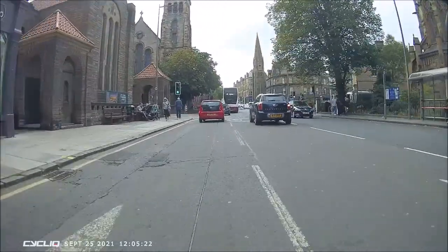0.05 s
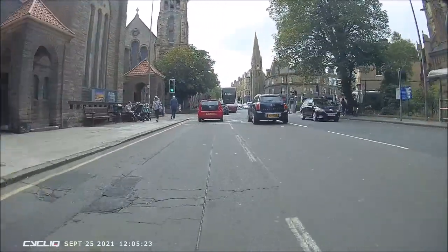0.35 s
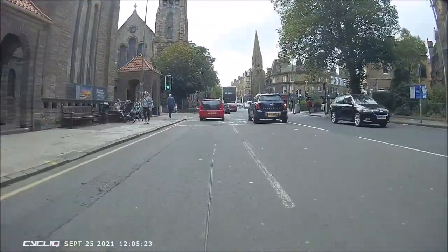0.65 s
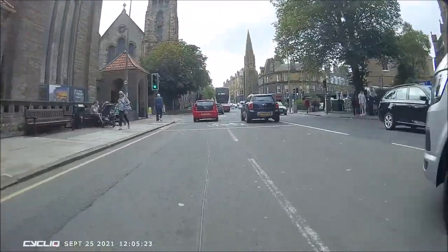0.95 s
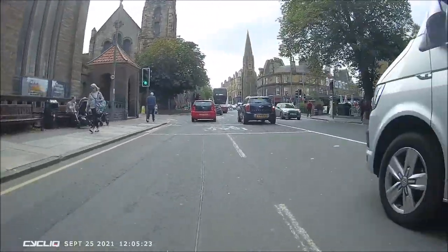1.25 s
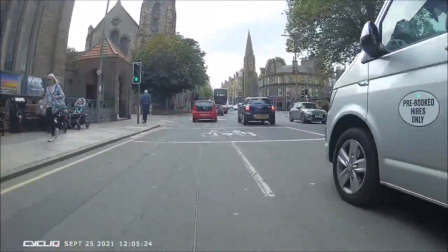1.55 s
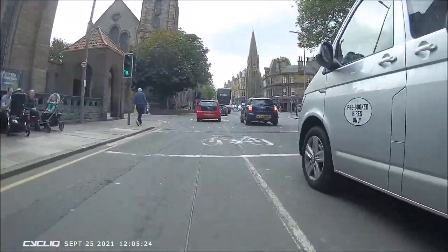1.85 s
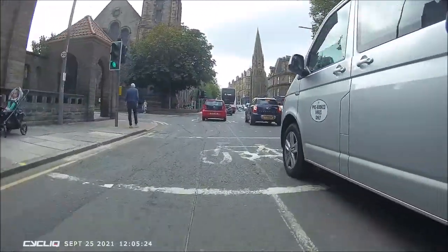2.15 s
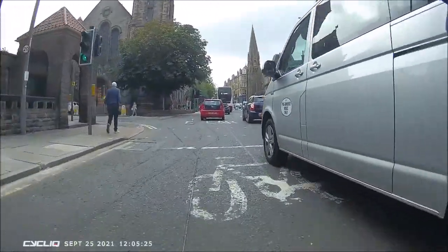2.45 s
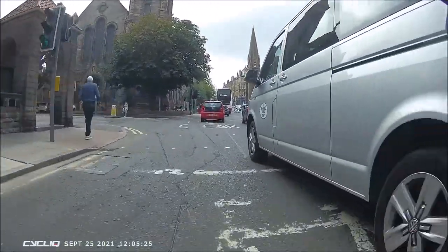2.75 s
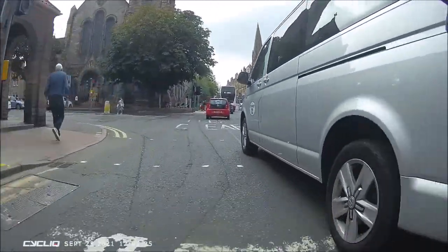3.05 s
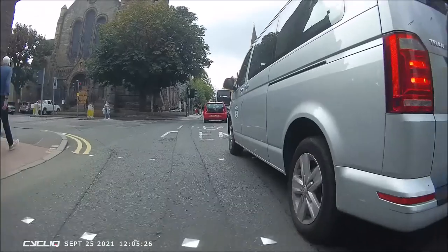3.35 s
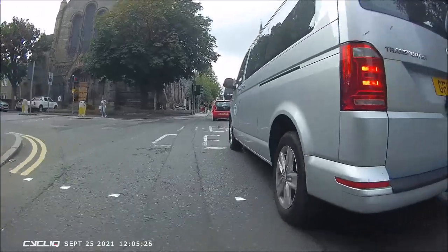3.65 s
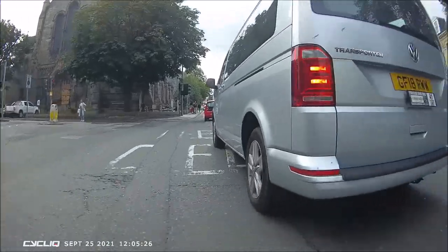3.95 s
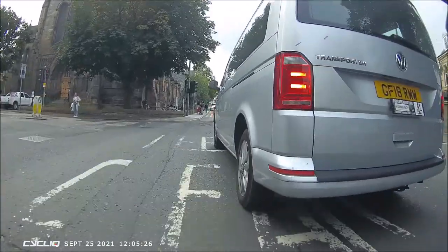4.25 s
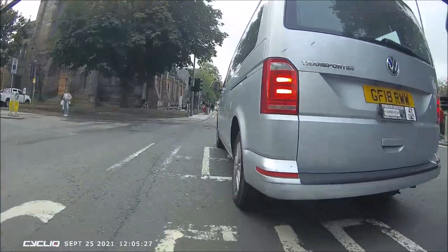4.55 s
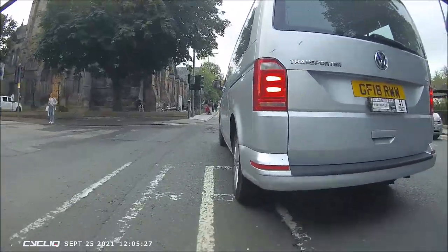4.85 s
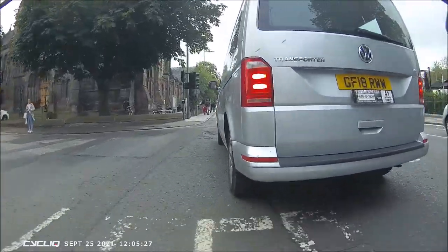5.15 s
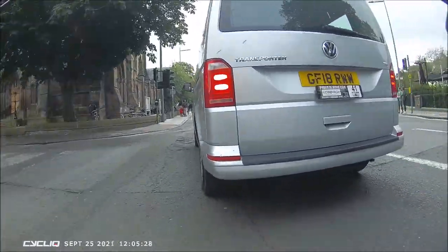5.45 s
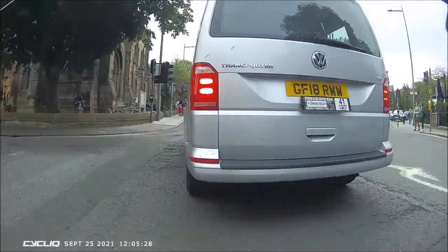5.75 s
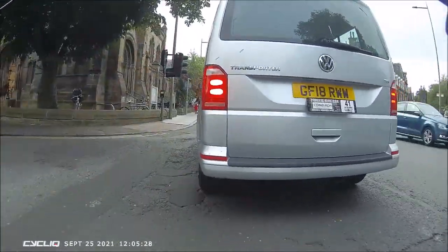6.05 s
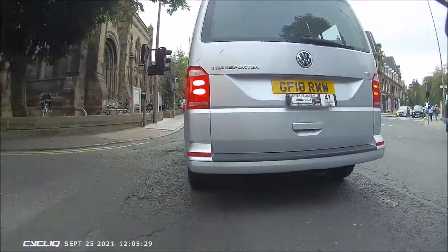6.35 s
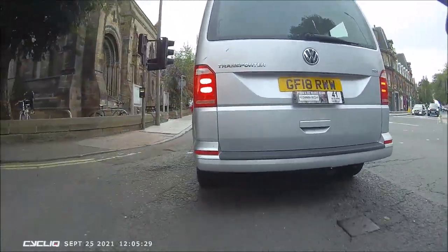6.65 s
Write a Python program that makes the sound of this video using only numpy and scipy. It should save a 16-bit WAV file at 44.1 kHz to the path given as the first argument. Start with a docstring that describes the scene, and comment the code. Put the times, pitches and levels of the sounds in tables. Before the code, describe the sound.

A bicycle rolls through city traffic with rumbling tyres, wind and rattling bumps, and its bell rings three times.

```python
"""A low drone and a roar of tyres and traffic: a bicycle on a city street, heard from a handlebar camera.
The road shakes the camera case, wind buffets the microphone, grit snaps and bumps rattle the bike.
A van alongside booms on and off. From about 3.9 s the rider flicks the bell three times: the lever
clacks through the bar and the dome rings on. The street quietens as the bike slows."""
import sys
import numpy as np
from scipy import signal
from scipy.fft import rfft, irfft
from scipy.io import wavfile
from scipy.ndimage import uniform_filter1d

SR = 44100
rng = np.random.default_rng(int(sys.argv[2]) if len(sys.argv) > 2 else 0)


def to_wav(s):
    """Save 16-bit WAV."""
    ch = np.atleast_2d(s).T  # columns
    pcm = np.round(np.clip(ch, -1, 1) * 32767)  # PCM
    wavfile.write(sys.argv[1], SR, pcm.astype(np.int16))


N = 299880
TIME = np.arange(N) / SR
BINS = np.fft.rfftfreq(N, 1 / SR)

# tyre and traffic noise, falling as the bike slows: t/s, level/dB
RIDE_LEVEL = [(0.0, -48), (0.26, -48), (1.89, -45), (2.27, -47.5), (2.69, -49), (2.86, -50.5),
              (3.84, -51.5), (4.53, -53.5), (4.85, -54), (5.36, -56.5), (5.64, -54), (6.02, -58),
              (6.29, -62.5), (6.8, -62)]
# loose fittings: f/Hz, level/dB, t60/s
FITTING_MODES = [(1220, -13, 0.023), (1553, -8.5, 0.034), (2180, 2.5, 0.0052), (2564, -4, 0.017),
                 (2970, -11, 0.0085), (3793, -17.5, 0.02), (4450, -21.5, 0.0098), (5700, -28, 0.0068),
                 (6900, -26, 0.0061), (9000, -26, 0.0086)]
# rattling parts, likely chain and mudguard: f/Hz, level/dB, t60/s
RATTLE_MODES = [(1154, 0.5, 0.031), (1555, 3.5, 0.024), (1840, -4, 0.033), (2100, -0.5, .014),
                (2400, -3.5, 0.016), (2750, -12, 0.017), (3200, -21.5, .025), (3760, -20, 0.014),
                (4090, -17, 0.014), (4800, -20.5, .02), (6600, -20.5, 0.006)]
# the bike's frame: f/Hz, level/dB, t60/s
FRAME_MODES = [(348, 0.5, 0.063), (455, 2, 0.047), (731, 4.5, 0.025), (915, 1, 0.017)]


def amp(db):
    """Decibels to gain."""
    return 10 ** (np.asarray(db) / 20)


def unit(x):
    """Scales to rms 1."""
    return x / np.sqrt(np.mean(x ** 2) + 1e-20)


def fader(points):
    """A gain for every sample from points of t/s, level/dB."""
    times, db = np.transpose(points)
    return amp(np.interp(TIME, times, db))


def follow_ride(db, slope, cruise_db=-48):
    """A gain of db when cruising that moves by slope dB per dB of tyre noise."""
    return amp(db) * (fader(RIDE_LEVEL) / amp(cruise_db)) ** slope


def swell(base, events):
    """Adds the power of smooth swells (t/s, level/dB, half length/s) to a base gain."""
    power = sum(amp(db) ** 2 * np.exp(-((TIME - s) / half) ** 2) for s, db, half in events)
    return np.sqrt(base ** 2 + power)


def add(mix, s, sound):
    """Lays a sound into the mix at time s."""
    part = mix[round(s * SR):][:len(sound)]
    part += sound[:len(part)]


def colour(x, points):
    """Shapes x with an EQ curve (f/Hz, level/dB), at rms 1."""
    hz, db = np.transpose(points)
    bins = np.fft.rfftfreq(len(x), 1 / SR)
    curve = amp(np.interp(np.log(bins + 1), np.log(hz), db))
    return unit(irfft(rfft(x) * curve, len(x)))


def resonate(x, peaks):
    """Passes x through steep-sided resonances (f/Hz, width/Hz, level/dB), at rms 1."""
    power = sum(amp(db) ** 2 / (1 + ((BINS - hz) / width) ** 2 * 2) ** 3 for hz, width, db in peaks)
    return unit(irfft(rfft(x) * np.sqrt(power), N))


def drift(rate_hz):
    """Slow random movement of rms 1."""
    return unit(irfft(rfft(rng.standard_normal(N)) * np.exp(-(BINS / rate_hz) ** 2), N))


def decay(t, t60):
    """An envelope that falls 60 dB in t60 seconds."""
    return np.exp(-np.log(1000) * t / t60)


def ring(modes, soft_hz=5500, size=4096):
    """Damped modes after one blow; the contact takes a moment, which dulls the attack."""
    t = np.arange(size) / SR
    swing = sum((-1) ** k * amp(db) * decay(t, t60) * np.sin(2 * np.pi * hz * t)
                for k, (hz, db, t60) in enumerate(modes))
    return signal.lfilter(*signal.butter(2, soft_hz, fs=SR), swing)


def road(case_db=1, tyres_db=-0.5, lumps_db=2.2, flutter_db=1.5, treble_hz=2100):
    """The bed: tarmac shakes the case; tyres and traffic roar through the mic port over faint hiss."""
    # broad resonances of the camera case and of the microphone port: f/Hz, width/Hz, level/dB
    case_peaks = [(98, 44, -4.5), (156, 49, -7.5), (355.5, 46, -10.5), (400, 63, -12.5), (477.3, 58, -17),
                  (634, 17, -30.5)]
    port_peaks = [(726, 352, 3.5), (917, 210, -0.5), (1240, 290, -5.5), (1610, 520, -10.5),
                  (2180, 190, -14.5), (2430, 170, -11), (2875, 170, -12), (3240, 90, -23.5),
                  (3814, 250, -26), (4240, 550, -37), (4820, 150, -35.5)]
    # tone of the air hiss: f/Hz, level/dB
    hiss_eq = [(500, 15.5), (4000, 2.5), (7000, -2.5), (10500, -6), (12000, -20), (13500, -33),
               (16000, -35.5)]
    # its fader: t/s, level/dB
    hiss_level = [(0, -70.5), (1.3, -70.7), (1.9, -74), (2.5, -76), (3.4, -82), (3.9, -74.5), (5.3, -80),
                  (5.7, -82.5), (6.3, -82.5), (6.8, -85)]
    shake, roar, hiss = rng.standard_normal((3, N))
    case = amp(case_db) * resonate(shake, case_peaks) * amp(lumps_db * drift(8.7))
    tyres = amp(tyres_db) * resonate(roar, port_peaks) * amp(flutter_db * drift(22))
    dull = signal.sosfiltfilt(signal.butter(2, treble_hz, fs=SR, output="sos"), tyres)
    tyres = dull + (tyres - dull) * follow_ride(db=0.54, slope=1)  # the top fades as the bike slows
    air = colour(hiss, hiss_eq) * fader(hiss_level)
    return case * follow_ride(db=-36, slope=0.7) + tyres * fader(RIDE_LEVEL) + air


def case_drone(evenness=0.46, settle_s=0.057):
    """The road keeps the camera case humming; uneven tarmac makes it throb."""
    # the case's two chief resonances and a weaker neighbour: f/Hz, width/Hz, level/dB
    drone_peaks = [(212.9, 21.7, 2), (250.4, 24, -0.06), (275.5, 11, -7)]
    # uneven stretches of tarmac: t/s, level/dB, half length/s
    bumps = [(0.028, -29.5, 0.04), (0.608, -30.5, 0.097), (0.928, -36, 0.025), (1.483, -27.5, 0.03),
             (1.74, -26.5, 0.031), (2.166, -23, 0.024), (2.546, -33, 0.082), (2.827, -27.5, 0.096),
             (3.091, -35.5, 0.14), (3.288, -33, 0.11), (3.532, -27.5, 0.021), (4.278, -29, 0.017),
             (4.73, -30, 0.017), (5.156, -33.5, 0.034), (6.552, -39.5, 0.096)]
    hum = resonate(rng.standard_normal(N), drone_peaks)
    envelope = np.sqrt(abs(uniform_filter1d(hum ** 2, round(settle_s * SR))) + 1e-6)
    steadied = unit(hum / envelope ** evenness)
    return steadied * swell(follow_ride(db=-34, slope=0.67), bumps)


def wind(buffet_db=-1.5, lumps_db=1.0):
    """Air buffets the microphone with a low rumble; its eddies reach higher."""
    # tone of the buffeting and of the eddies: f/Hz, level/dB
    buffet_eq = [(5, -12), (18, -4.5), (36, 5.5), (48, -1.5), (65, -21.5), (100, -15.5), (170, -21),
                 (400, -45.5), (1500, -84.5)]
    eddy_eq = [(20, -11.5), (45, -2), (75, 2), (130, -11), (200, -25.5), (500, -29.5), (1700, -42.5),
               (2600, -60), (3200, -71), (8000, -89), (15000, -115)]
    # gusts, the later ones in the van's wake: t/s, buffeting/dB, eddies/dB, half length/s
    gusts = [(0.166, -23, -50, 0.037), (0.758, -13, -26.5, 0.016), (2.668, -33.5, -31, 0.11),
             (3.153, -36.5, -33.5, 0.15), (3.385, -20.5, -44, 0.022), (4.953, -23.5, -29.5, 0.037),
             (5.53, -36.5, -33, 0.14), (5.677, -22.5, -36, 0.1), (5.943, -18.5, -27, 0.031),
             (6.134, -33.5, -33.5, 0.13), (6.582, -23.5, -34.5, 0.11)]
    buffet_gain = swell(follow_ride(db=-26.5, slope=0.68), [(s, db, half) for s, db, _, half in gusts])
    eddy_gain = swell(follow_ride(db=-47, slope=0.72), [(s, db, half) for s, _, db, half in gusts])
    buffet = amp(buffet_db) * colour(rng.standard_normal(N), buffet_eq) * amp(lumps_db * drift(36))
    eddies = colour(rng.standard_normal(N), eddy_eq)
    return buffet * buffet_gain + eddies * eddy_gain


def grit(per_s=70, spread_db=3, grit_db=-17):
    """Small stones keep the fittings ticking faintly."""
    stones = amp(spread_db * np.minimum(rng.exponential(1, N), 2.5))
    stones *= rng.random(N) < per_s / SR
    ticking = signal.oaconvolve(stones, ring(FITTING_MODES, soft_hz=4970))[:N]
    return amp(grit_db) * unit(ticking) * fader(RIDE_LEVEL)


def rattle(per_s=240, spread_db=5.0, clump_db=4, clump_hz=38):
    """Coarse tarmac sets off clumps of tiny metallic contacts."""
    # rattle over the coarse patches: t/s, level/dB
    rattle_level = [(0, -59), (2.2, -68.5), (2.6, -58), (2.95, -68), (3.8, -59.5), (4.5, -73.5),
                    (4.95, -61), (5.3, -75.5), (5.68, -57), (5.8, -62), (5.94, -54), (6.03, -62.5),
                    (6.19, -55.5), (6.31, -73.5), (6.44, -74), (6.5, -58), (6.72, -53), (6.8, -66)]
    contacts = rng.choice([-1, 1], N) * amp(spread_db * np.minimum(rng.exponential(1, N), 3))
    contacts *= rng.random(N) < per_s / SR
    clumps = amp(clump_db * np.minimum(drift(clump_hz), 2))
    jangle = signal.oaconvolve(contacts * clumps, ring(RATTLE_MODES, soft_hz=6960))[:N]
    return unit(jangle) * fader(rattle_level)


def tarmac_cracks(per_s=2.5, rattle_db=4, thud_db=7, spread_db=2):
    """Small cracks in the tarmac jog the frame and fittings at random, harder at speed."""
    hits = rng.random(N) < per_s / SR
    blows = hits * amp(spread_db * rng.standard_normal(N)) * fader(RIDE_LEVEL)
    fittings = amp(rattle_db) * ring(FITTING_MODES, soft_hz=5270)
    frame = amp(thud_db) * ring(FRAME_MODES, soft_hz=1500)
    return .5 * signal.oaconvolve(blows, fittings + frame)[:N]


def snaps(stir_db=-2, size=256):
    """Dry clicks, as of grit pinched under the tyre, that just stir the loose parts."""
    # the pinches: t/s, peak/dB
    cues = [(.158, -41), (0.2143, -44.5), (.543, -42), (0.6143, -43), (1.423, -43), (1.5776, -44.5),
            (1.8606, -47), (1.9514, -43), (2.153, -42), (2.568, -44), (2.6695, -45), (2.7481, -46),
            (2.857, -44), (2.8722, -40.5), (3.207, -42), (3.7403, -46.5), (4.935, -49), (5.6068, -49),
            (5.674, -38), (5.687, -40), (5.7015, -45), (6.492, -46), (6.540, -44.5), (6.5537, -47),
            (6.6035, -46), (6.656, -46.5)]
    # tone of the click: f/Hz, level/dB
    click_eq = [(1000, -5.5), (4000, 3.5), (7000, -4.5), (10500, -8), (12000, -11), (15500, -25)]
    click = colour(signal.unit_impulse(size, "mid"), click_eq)
    parts = ring(RATTLE_MODES)
    pinches = np.zeros(N)
    for s, db in cues:
        add(pinches, s, [amp(db)])
    clicks = signal.oaconvolve(pinches, click / click.max(), "same")
    stirred = signal.oaconvolve(pinches, parts / abs(parts).max())[:N]
    return clicks + amp(stir_db) * stirred


def jolts(chatter=0.26, blow=0.26, size=2048):
    """Each bump thuds in the frame while loose fittings chatter."""
    # bumps in the road: t/s, rattle/dB, thud/dB, chatter length/s
    cues = [(0.5579, -23, -28.5, 0.0025), (0.695, -26.5, -59, 0.0027), (0.83, -33, -37, 0.0027),
            (1.381, -27, -29, 0.0026), (1.805, -31, -29.5, 0.0013), (1.8511, -13.5, -16.5, 0.0029),
            (1.9640, -50, -19, 0.01), (2.017, -24.5, -29, 0.0026), (2.0650, -23.5, -19.5, 0.0082),
            (2.155, -19, -12.5, 0.0089), (2.1803, -26.5, -32, 0.0013), (2.391, -48, -33.5, 0.0027),
            (2.4762, -17.5, -41, 0.0014), (2.7053, -30.5, -28, 0.0032), (3.262, -32.5, -32.5, 0.0022),
            (3.301, -29, -70, 0.001), (3.493, -47.5, -37.5, 0.0022), (3.823, -38, -33, 0.0012),
            (4.122, -26, -16.5, 0.0032), (4.3490, -23.5, -20, 0.00091), (4.59, -21, -24.5, 0.0023),
            (4.674, -43, -48, 0.0015), (4.6944, -17, -23, 0.0041), (4.894, -27, -54.5, 0.0045),
            (4.981, -33, -57, 0.0062), (5.458, -33, -32, 0.0036), (5.6610, -25.5, -34, 0.0015),
            (5.683, -30, -37, 0.0034), (5.715, -35, -46, 0.002), (5.7757, -41, -45, 0.003),
            (5.88, -43, -44, 0.0022), (6.045, -40.5, -48, 0.003), (6.0902, -38, -46, 0.003),
            (6.133, -37, -37, 0.0034), (6.145, -38, -35, 0.003), (6.194, -42.5, -50.5, 0.0023),
            (6.499, -43, -29, 0.0083), (6.563, -40, -35.5, 0.0083), (6.676, -37.5, -33, 0.0083),
            (6.7266, -34.5, -38, 0.0065)]
    out, t = np.zeros(N), np.arange(size) / SR
    fittings, frame = ring(FITTING_MODES, soft_hz=5200), ring(FRAME_MODES, soft_hz=1490)
    for s, rattle_db, thud_db, length in cues:
        contacts = rng.standard_normal(size) * t * np.exp(-2 * t / length)  # rebounds after the blow
        contacts *= chatter / np.linalg.norm(contacts)
        contacts[0] += blow
        add(out, s, signal.fftconvolve(contacts, amp(rattle_db) * fittings + amp(thud_db) * frame))
    return out


def frame_hum():
    """Worn tarmac sets the frame humming."""
    # the frame's resonances: f/Hz, width/Hz, level/dB
    hum_peaks = [(349, 40, 0), (415, 89, -2), (503, 98, -11)]
    # worn stretches of road: t/s, level/dB, half length/s
    stretches = [(1.4, -41.5, .2), (2.152, -40, .45)]
    return resonate(rng.standard_normal(N), hum_peaks) * swell(0, stretches)


def knocks():
    """Clean, bright single blows on a hard part of the bike."""
    # the blows: t/s, level/dB
    cues = [(1.851, -14.5), (2.158, -31), (2.477, -32), (3.302, -41.5), (5.661, -40)]
    # the struck part: f/Hz, level/dB, t60/s
    part_modes = [(1168, -11, 0.037), (1730, -1.5, 0.009), (2130, 1.5, 0.011), (2445, -3, .013),
                  (2840, -9.5, 0.016), (3740, -17, 0.017), (4680, -24, .008), (5790, -27.5, 0.011),
                  (6500, -30, 0.0065), (8960, -35, .005)]
    out = np.zeros(N)
    for s, db in cues:
        add(out, s, amp(db) * ring(part_modes, soft_hz=9000))
    return out


def creak(size=4096):
    """A fitting rubs and lets go: dense slips swell and fade in a few narrow resonances."""
    # the rub: t/s at its peak, level/dB, half length/s, release/dB
    cues = [(1.9636, -29, 0.0059, -28.5)]
    # the rubbing part: f/Hz, level/dB, t60/s
    part_modes = [(1204, -14, 0.085), (1427, -7.5, 0.06), (2016, 2, 0.05), (2140, 2.5, 0.034),
                  (2500, -5.5, 0.07), (2755, -5.5, 0.05)]
    out, t = np.zeros(N), (np.arange(size) - size // 2) / SR
    body = ring(part_modes, soft_hz=2980)
    for s, db, half, release_db in cues:
        add(out, s, amp(release_db) * body)
        slips = rng.standard_normal(size) * np.exp(-abs(t) / half)
        add(out, s + t[0], amp(db) * signal.fftconvolve(slips, body / np.linalg.norm(body)))
    return out


def van():
    """A low, narrow boom, likely the exhaust, comes and goes beside the van."""
    # the boom's resonance: f/Hz, width/Hz, level/dB
    boom_peak = [(132.4, 29, 0)]
    # its swells: t/s, level/dB, half length/s
    booms = [(2.302, -33, 0.023), (2.672, -33.5, 0.044), (3.33, -35.5, 0.032), (4.385, -42, 0.037),
             (4.55, -40, 0.032), (4.88, -35, 0.078), (5.025, -32, 0.029), (5.554, -37, 0.064),
             (5.882, -34.5, 0.04)]
    return resonate(rng.standard_normal(N), boom_peak) * swell(0, booms)


def bell_lever(tick_s=0.00055, rise_s=0.00027, buzz_db=-21, buzz_s=0.0029, rock_lead_s=0.0091,
               ring_share=0.66, bar_hz=1400, bright_hz=2200, size=2048):
    """The lever scrapes, slips its catch, strikes and rebounds, clacking through the handlebar."""
    # thumb flicks: t/s, knock/dB, tick/dB, scrape lead/s, scrape/dB, slip lead/s, slip/dB,
    # chatter delay/s, bar boost/dB, bright boost/dB, rocking/dB, rebound delay/s, rebound/dB re blow
    flicks = [(3.906, -7.5, -17.5, 0.022, -30.5, 0.0095, -40, 0.0062, 0.5, 5.5, -6.5, 0.017, -5.5),
              (4.127, -15, -31.5, 0.011, -38, 0.0043, -39.5, 0.00181, -5.5, -4, -4, .0168, -9),
              (4.7050, -10.5, -23, 0.011, -31, 0.0082, -26, .0045, -2, 1, -8, .0175, -7.5)]
    # the lever knocks as the thumb takes hold: t/s, knock/dB, tick/dB
    clacks = [(3.8886, -30, -54.5), (4.284, -30, -53), (4.3464, -30, -46), (4.349, -35, -47)]
    # ring of bell mount and handlebar, and the bar's rocking under the thumb: f/Hz, level/dB, t60/s
    mount_modes = [(770, -23.5, 0.023), (1102, -1, 0.02), (1210, -19, 0.016), (1500, 3, 0.02),
                   (1800, -9.5, 0.016), (2370, -39, 0.016), (3040, -30, 0.024), (3160, -30.5, 0.022),
                   (3740, -22, 0.018), (4200, -19, 0.0079), (4620, -28, 0.023)]
    rock_modes = [(36, -12, 0.074)]
    # tone of the metal tick: f/Hz, level/dB
    tick_eq = [(1000, -18), (2500, 2), (4400, 8.5), (5200, -18.5), (6200, -2), (7500, 5), (8500, -8),
               (9800, 2.5), (11500, -17), (15500, -16.5)]
    out, t = np.zeros(N), np.arange(size) / SR
    gripped = [(hz, db, t60 * ring_share) for hz, db, t60 in mount_modes]  # the hand shortens the ring
    mount, rock = ring(gripped), ring(rock_modes)
    attack = 1 - np.exp(-t / rise_s)
    tick_envelope = attack * (np.exp(-t / tick_s) + amp(buzz_db) * np.exp(-t / buzz_s))

    def tick(s, db):
        """Metal meets metal in a tiny burst of noise."""
        add(out, s - rise_s, amp(db) * tick_envelope * colour(rng.standard_normal(size), tick_eq))

    def clack(s, knock_db, tick_db, bar_db=0, bright_db=0):
        """A tick that rings the mount; the grip sets the bar's low modes, a hard flick the highs."""
        modes = [(hz, db + bar_db * (hz < bar_hz) + bright_db * (hz > bright_hz), t60)
                 for hz, db, t60 in gripped]
        add(out, s, amp(knock_db) * ring(modes))
        tick(s, tick_db)

    for (s, knock_db, tick_db, scrape_s, scrape_db, slip_s, slip_db,
         chatter_s, bar_db, bright_db, rock_db, rebound_s, rebound_db) in flicks:
        rubbing = rng.standard_normal(size) * (t < scrape_s)
        scrape = signal.fftconvolve(rubbing, mount / np.linalg.norm(mount))
        add(out, s - scrape_s, amp(scrape_db) * scrape)
        add(out, s - rock_lead_s, amp(rock_db) * rock)
        tick(s - slip_s, slip_db)
        clack(s, knock_db, tick_db, bar_db, bright_db)
        # the hammer chatters, then falls back on its stop
        clack(s + chatter_s, knock_db - 9.5, tick_db - 15.5, bar_db)
        clack(s + rebound_s, knock_db + rebound_db, tick_db - 15, bar_db, bright_db=-6.5)
    for row in clacks:
        clack(*row)
    return out


def bell_dome(low_hz=3750, high_hz=9787, twin_hz=4.2, octave_db=-18, octave_twin=.85,
              damp_s=0.0047, damped_db=-8, linger_s=.1, waver_db=1.5, octave_waver_db=2.5, shake_hz=26):
    """The struck dome rings: a low note beating with its twin, its octave, and a short high note."""
    # hammer on the dome: t/s, low note/dB, high note/dB, twin share/0-1, beat peak delay/s,
    # free ring/s until damped or struck again
    strikes = [(3.9063, -57.5, -40.5, .05, 0, 0.017), (3.926, -59, -53.5, 0.3, 0.16, 0.19),
               (4.1260, -53, -42, 0.3, 0.12, 0.17), (4.3486, -74.5, -63.5, 0, 0.011, 0.33),
               (4.7043, -56, -38.5, 0.85, 0, .8), (4.8934, -71, -93, 0.9, 0.017, 0.33)]
    lows, octaves, highs = np.zeros((3, N), complex)
    t = np.arange(2 * SR) / SR
    low, high, octave = decay(t, t60=1.7), decay(t, t60=0.34), decay(t, t60=.8)
    for s, low_db, high_db, twin, beat_peak_s, free_s in strikes:
        beat = np.exp(2j * np.pi * twin_hz * (t - beat_peak_s))
        since_damped = np.maximum(t - free_s, 0)
        damping = np.exp(-since_damped / damp_s)
        # some of the low note lingers under the thumb
        muffled = damping + (1 - damping) * amp(damped_db) * np.exp(-since_damped / linger_s)
        add(lows, s, amp(low_db) * low * (1 + twin * beat) * muffled)
        add(highs, s, amp(high_db) * high * damping)
        add(octaves, s, amp(low_db + octave_db) * octave * (1 + octave_twin * beat ** 2) * damping)
    # one carrier a note, so each strike feeds the ring under way
    low_carrier, high_carrier = (np.exp(2j * np.pi * hz * TIME) for hz in (low_hz, high_hz))
    notes = (lows * low_carrier + highs * high_carrier).imag
    overtone = (octaves * low_carrier ** 2).imag
    # the dome shakes on the moving bike
    return notes * amp(waver_db * drift(shake_hz)) + overtone * amp(octave_waver_db * drift(shake_hz))


def street_echo(x, echo_db=-21, t60=0.079, delay_s=0.00076):
    """The street and the van's side add a faint, short scatter of reflections."""
    # tone of the reflections: f/Hz, level/dB
    echo_eq = [(300, -3), (1500, -5.5), (4000, -7), (8000, 0.5), (11000, -5.5), (15000, -18)]
    t = np.arange(SR // 2) / SR
    tail = colour(rng.standard_normal(len(t)), echo_eq) * decay(t, t60) * (t > delay_s)
    return x + amp(echo_db) * signal.oaconvolve(x, tail / np.linalg.norm(tail))[:N]


def scene():
    """The mono mix at the handlebar; only the impacts feed the echo."""
    impacts = street_echo(bell_lever() + jolts() + knocks() + creak() + tarmac_cracks())
    bell = bell_dome()
    rolling = road() + case_drone() + frame_hum() + grit() + rattle() + snaps()
    return (bell + impacts + rolling + wind() + van())[None]


def record(dry, ceiling=.52, cutoff_hz=15700, taps=511):
    """The loudest knocks overload the microphone; a steep low-pass trims the top."""
    clipped = dry / (1 + (dry / ceiling) ** 8) ** (1 / 8)
    padded = np.pad(clipped, ((0, 0), (taps // 2, taps // 2)), mode="edge")
    lowpass = signal.firwin(taps, cutoff_hz, window=("kaiser", 9), fs=SR)
    return signal.oaconvolve(padded, lowpass[None], "valid")


dry = scene()
out = record(dry)
to_wav(out)
```